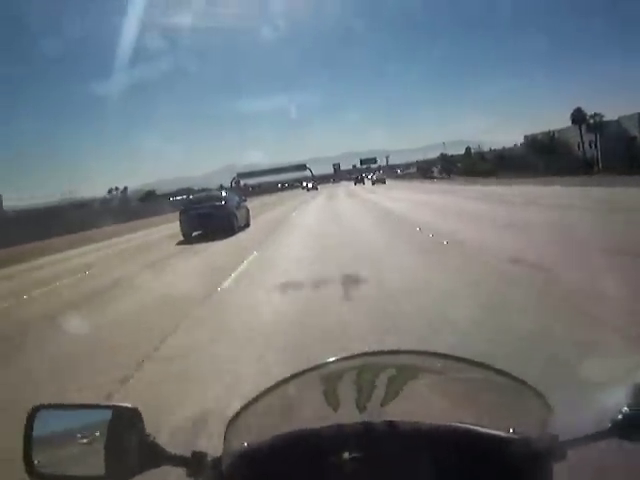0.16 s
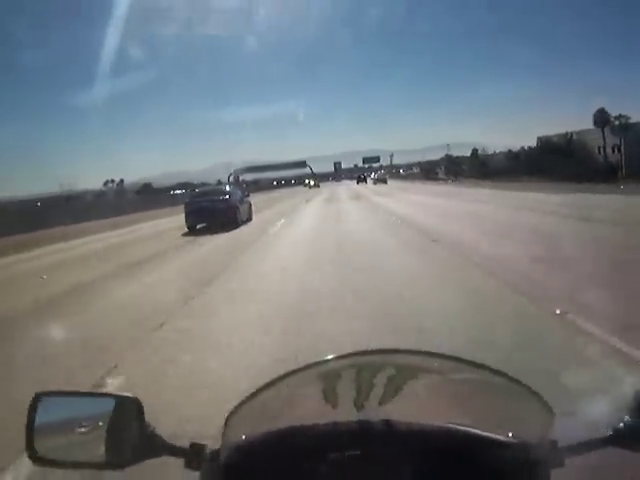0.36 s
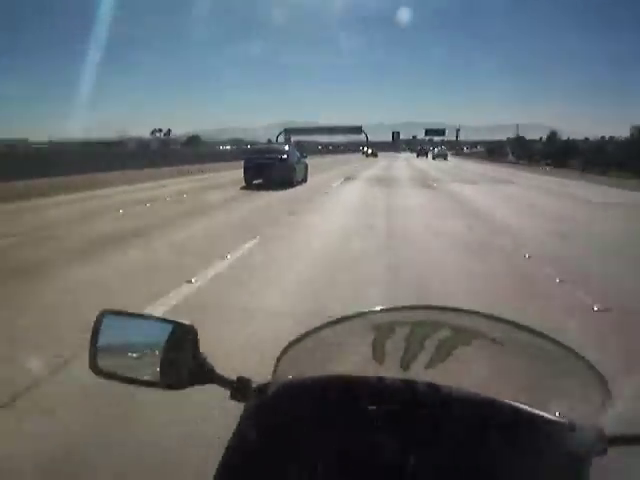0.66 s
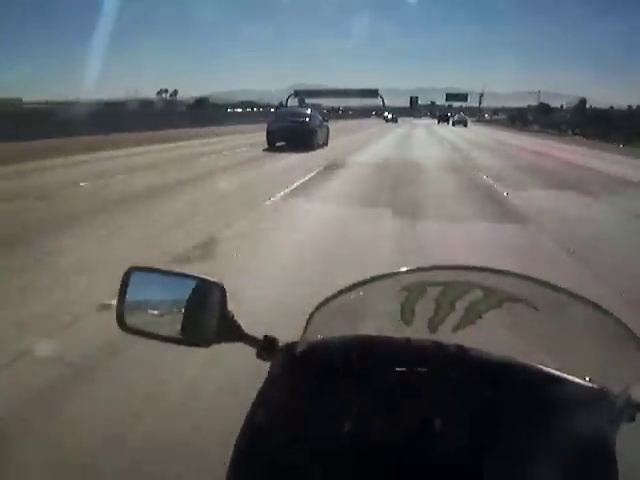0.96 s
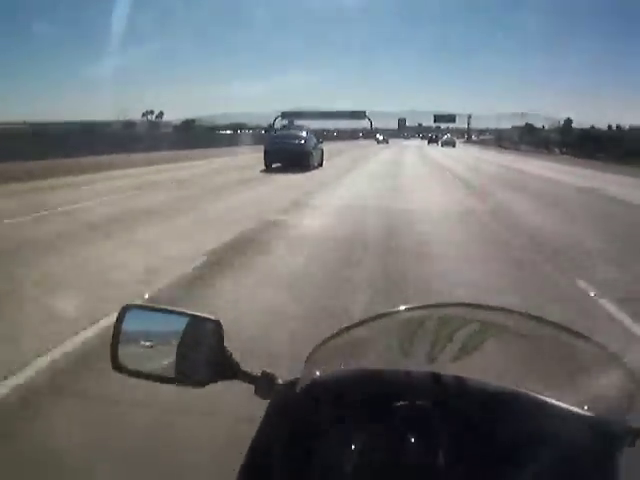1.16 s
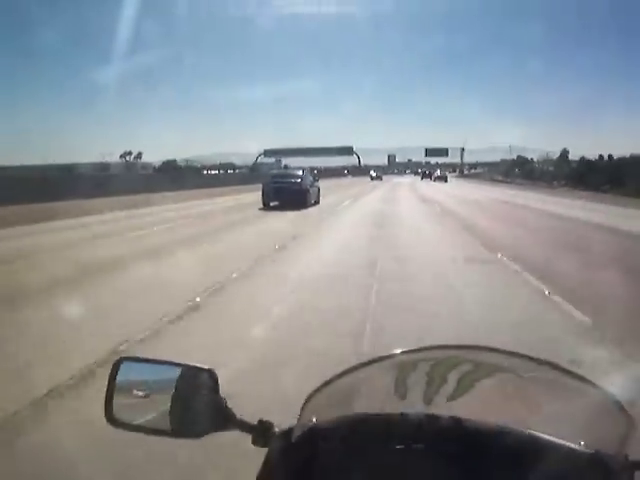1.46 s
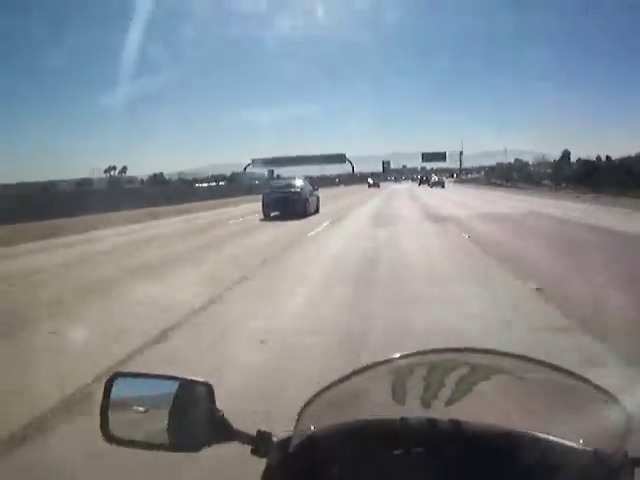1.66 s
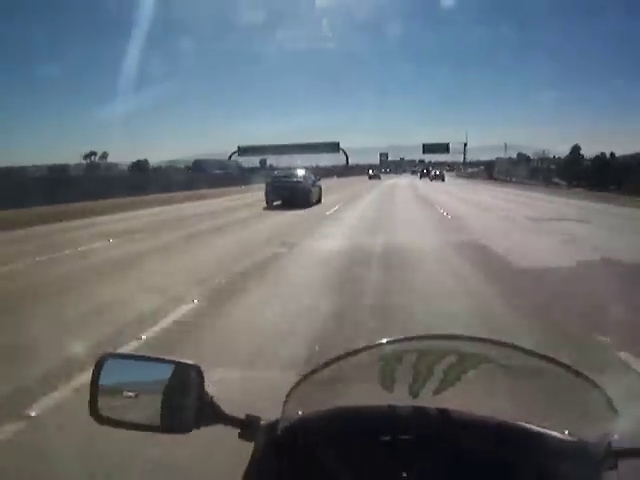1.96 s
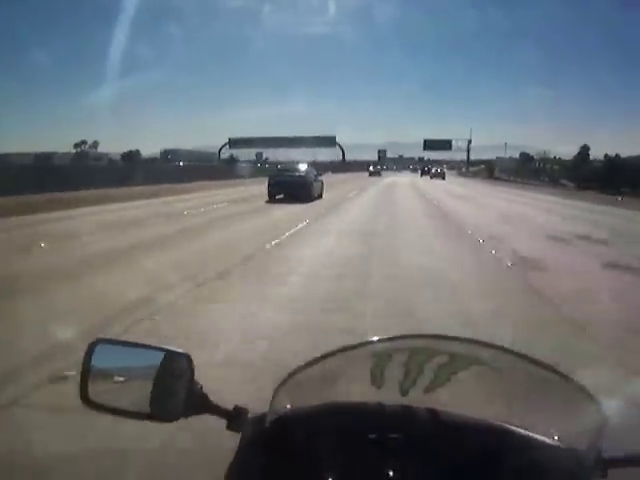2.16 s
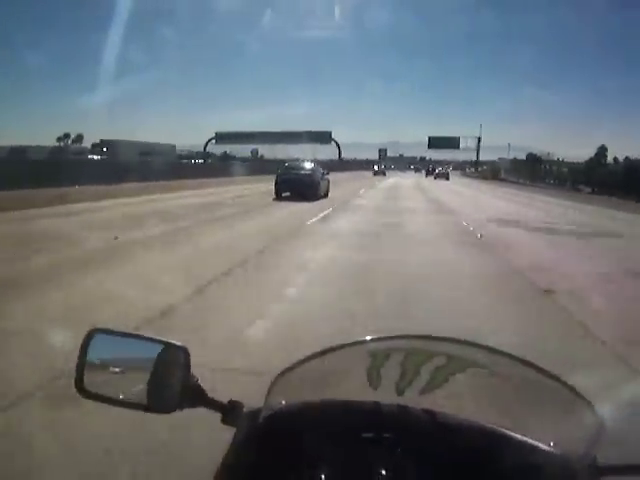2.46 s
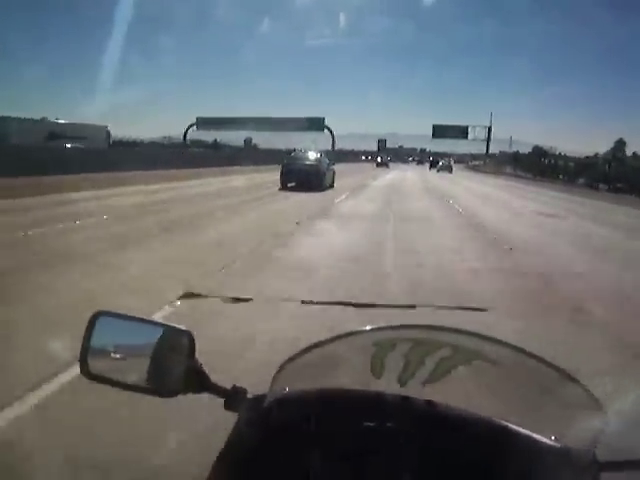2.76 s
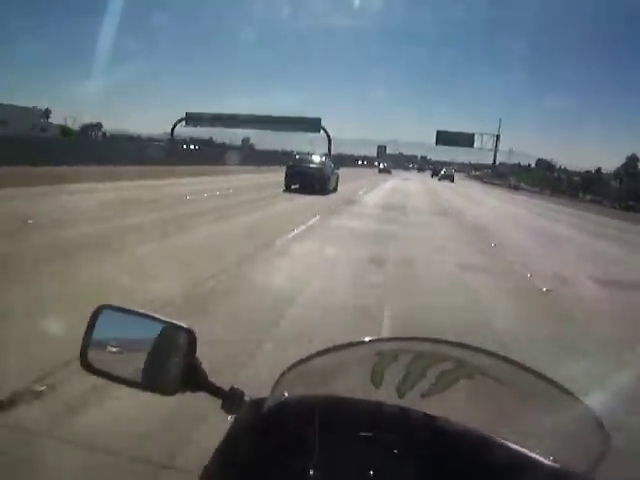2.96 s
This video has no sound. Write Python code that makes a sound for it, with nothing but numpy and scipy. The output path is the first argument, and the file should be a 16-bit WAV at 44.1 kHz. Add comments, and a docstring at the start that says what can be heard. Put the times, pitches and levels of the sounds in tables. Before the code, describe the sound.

Steady motorcycle drone at speed, buried in heavy low wind rumble and thumping microphone gusts

```python
"""Motorcycle cruising on a freeway

A motorcycle heard from a camera on the rider: orders of the firing rate hum and slowly climb in pitch.
Shaped noise makes the wind's rumble, buffeting and rush past the windscreen; short pushes thump and slap.
Tyres roar on the concrete as steady coloured noise, and an edge whistles faintly in narrow puffs.
Pressure swings rasp in the microphone, which rounds off the largest and answers pushes more than pulls."""
import sys
import numpy as np
from scipy.fft import rfft, irfft, next_fast_len
from scipy.io import wavfile
from scipy.ndimage import uniform_filter1d, map_coordinates

SR = 44100
rng = np.random.default_rng(int(sys.argv[2]) if len(sys.argv) > 2 else 0)


def digitize_waveform(pressure):
    """Quantize a signal to 16-bit integers and store it at the path in sys.argv[1].

    Rows of a 2-D input are taken as channels; values are limited to [-1, 1].
    """
    field = np.atleast_2d(pressure).T
    bounded = np.clip(field, -1, 1)
    quanta = np.round(bounded * 32767).astype(np.int16)
    wavfile.write(sys.argv[1], SR, quanta)


N = 136710  # samples, 3.1 s


def amp(db):
    """Decibels to gain."""
    return 10 ** (np.asarray(db) / 20)


def unit(x):
    """Scale to rms 1."""
    return x / np.sqrt(np.mean(x ** 2) + 1e-20)


def curves(rows):
    """One value per sample for each column after the time."""
    knots_s, *columns = np.transpose(rows)
    t = np.arange(N) / SR
    return [np.interp(t, knots_s, column) for column in columns]


def wobble(rate):
    """A smooth random curve through rate random knots a second."""
    knots = rng.standard_normal(int(N * rate / SR) + 4)
    return map_coordinates(knots, [np.arange(N) * rate / SR])


def filtered(x, response):
    """Multiply the spectrum of x by a response of frequency."""
    size = next_fast_len(N + SR // 2)  # zero padding keeps the end from wrapping to the start
    hz = np.fft.rfftfreq(size, 1 / SR)
    return irfft(rfft(x, size) * response(hz), size)[:N]


def noise(spectrum):
    """Noise of rms 1 coloured by (Hz, dB) points on a log axis."""
    points_hz, points_db = np.transpose(spectrum)

    def colour(hz):
        return amp(np.interp(np.log(hz + 1), np.log(points_hz + 1), points_db))

    return unit(filtered(rng.standard_normal(N), colour))


def evened(x, size):
    """Even out the slow chance swells of x over size samples, and scale to rms 1."""
    power = np.abs(uniform_filter1d(x ** 2, size))
    return unit(x / np.sqrt(power + 1e-9))


def bumps(events, half_s):
    """A bell-shaped swell for each (s, peak dB)."""
    t = np.arange(N) / SR
    return sum(amp(db) * np.exp(-np.minimum(((t - s) / half_s) ** 2, 20)) for s, db in events)


# firing rate of the engine: (time_s, rate_hz)
FIRING_RATE = [(0, 223.7), (.8, 227.7), (1.4, 229.9), (1.75, 231.6), (2.0, 232.6), (3.1, 237.3)]
# orders in the exhaust note: (multiple of the firing rate, level_db rms at mid-scene, drift_db_per_s)
EXHAUST_ORDERS = [(1, -30, 1.4), (2, -34, -1.1), (3, -57, -3), (4, -55, -1), (4.5, -74.5, 0), (5, -65, -3),
                  (5.5, -73, 5), (6, -57.5, 0), (6.5, -75.5, 1.5), (7, -69, -1.5), (7.5, -71, 2)]
# gain on the whole exhaust note, easing a little midway: (time_s, gain_db)
EXHAUST_GAIN = [(0, 0.5), (.45, 0.4), (1.35, 0.7), (1.8, -2), (2.15, 0), (2.45, 0.6), (3.1, 0.6)]
FLUTTER_DB, JITTER_RAD = 0.83, 0.037  # unevenness of the firings in strength and in timing


def engine():
    """Sines at orders of the firing rate share one timing unevenness; each flutters in level by itself."""
    rate_hz, = curves(FIRING_RATE)
    gain_db, = curves(EXHAUST_GAIN)
    phase = 2 * np.pi * np.cumsum(rate_hz) / SR + JITTER_RAD * wobble(45)
    from_middle_s = (np.arange(N) - N / 2) / SR
    note = np.zeros(N)
    for order, order_db, drift_db_per_s in EXHAUST_ORDERS:
        level_db = gain_db + order_db + drift_db_per_s * from_middle_s + FLUTTER_DB * wobble(16)
        start_phase = 2 * np.pi * rng.random()
        note += np.sqrt(2) * amp(level_db) * np.sin(order * phase + start_phase)
    return note


# levels of the deepest rumble, the buffeting and the rushing air, before their trims: (time_s, level_db)
RUMBLE_LEVEL = [(0, -22.5), (.13, -18.5), (.23, -28.5), (.35, -21), (.47, -22), (.65, -14.5), (.78, -25),
                (1.02, -14.5), (1.2, -24.5), (1.35, -18.5), (1.46, -22), (1.55, -21.5), (1.9, -22.5),
                (2.08, -17.5), (2.25, -18.5), (2.65, -27.5), (2.92, -17.5), (3.08, -21)]
BUFFET_LEVEL = [(0, -18.5), (.1, -22), (.29, -23.5), (.36, -17.5), (.43, -19), (.49, -22), (.535, -19),
                (.6, -24), (.67, -21), (.76, -22), (.82, -20), (1.06, -19.5), (1.16, -20.5), (1.33, -20),
                (1.4, -23), (1.6, -21.5), (1.72, -20.5), (1.88, -22.5), (1.97, -21), (2.08, -19.5),
                (2.2, -19.5), (2.37, -21), (2.45, -18), (2.65, -21), (2.74, -16.5), (2.82, -20.5),
                (2.91, -20), (2.97, -17), (3.08, -22.5)]
AIR_LEVEL = [(0, -38), (.14, -47.5), (.23, -33.5), (.36, -39), (.5, -38), (.75, -39), (.84, -40),
             (1.1, -41), (1.24, -34), (1.38, -35), (1.52, -42.5), (1.78, -30.5), (1.86, -39.5),
             (1.96, -37.5), (2.04, -41.5), (2.3, -35), (2.56, -37.5), (2.72, -31), (2.82, -40.5), (3, -36),
             (3.08, -33.5)]
# relative spectra of the three wind layers: (frequency_hz, density_db per Hz)
RUMBLE_SPECTRUM = [(5, -23.5), (15, -1), (32, 17), (50, 10.5), (80, -17.5), (200, -64)]
BUFFET_SPECTRUM = [(20, -26.5), (55, 1), (90, 0.5), (150, -1.5), (225, -7), (300, -11), (420, -17),
                   (550, -26.5), (750, -37), (1400, -85)]
AIR_SPECTRUM = [(150, -6), (320, 8), (450, 1.5), (560, -1.5), (680, -7), (820, -12), (1000, -16),
                (1500, -20), (2500, -21), (5000, -53)]
RUMBLE_TRIM_DB, BUFFET_TRIM_DB, AIR_TRIM_DB = -2.5, -0.18, 1.5


def wind():
    """Slow eddies rumble, faster ones buffet the microphone, and air rushes past in quick flurries."""
    rumble_db, = curves(RUMBLE_LEVEL)
    buffet_db, = curves(BUFFET_LEVEL)
    air_db, = curves(AIR_LEVEL)
    rumble = amp(rumble_db + RUMBLE_TRIM_DB) * evened(noise(RUMBLE_SPECTRUM), size=4000)
    buffet = amp(buffet_db + BUFFET_TRIM_DB) * evened(noise(BUFFET_SPECTRUM), size=2500)
    flurries = amp(6.2 * np.tanh(wobble(100)))  # swings of up to 6.2 dB either way
    air = amp(air_db + AIR_TRIM_DB) * evened(noise(AIR_SPECTRUM) * flurries, size=4000)
    return rumble + buffet + air


# large eddies that thump the microphone: (time_s, peak_db of pressure before overload, half_length_s)
THUMPS = [(0.468, -12, 0.0039), (0.658, -18.5, 0.011), (1.018, -17, .009), (1.441, -19, 0.0088),
          (2.046, -12, 0.0047), (2.111, -14, 0.013), (2.867, -11, .006), (2.923, -8, 0.011)]


def thumps():
    """A large eddy gives one slow push with suction before and after it."""
    pressure = np.zeros(N)
    for s, peak_db, half_s in THUMPS:
        push = 2 * bumps([(s, peak_db)], half_s)
        suction = bumps([(s, peak_db)], 2 * half_s)
        pressure += push - suction
    return pressure


# hardest slaps of wind on the microphone: (time_s, peak_db of pressure before overload, hiss_db)
SLAPS = [(0.355, -12.5, -39.5), (.460, -11, -41), (.533, -4.5, -44), (.651, -5, -44), (0.716, -6, -41.5),
         (.817, -7.5, -44), (.841, -6.5, -46), (.964, -9.5, -40.5), (1.026, -11, -41.5), (1.082, -7.5, -49),
         (1.283, -13, -40), (1.374, -12.5, -46), (1.465, -7.5, -49), (1.593, -7.5, -45.5),
         (1.716, -9.5, -46), (1.798, -8.5, -43), (1.966, -8.5, -46), (2.070, -20, -37.5),
         (2.113, -2.5, -46), (2.201, -8, -41), (2.384, -9, -43), (2.918, -8.5, -38.5), (2.971, -12, -45)]
SLAP_S, SLAP_CLEARS_S = 0.0013, 0.003  # half lengths of the push and of the gap it makes in the other wind


def slaps(flow):
    """Single strong eddies displace the flow with one short push each."""
    taken = np.minimum(bumps([(s, 0) for s, _, _ in SLAPS], SLAP_CLEARS_S), 1)
    pushes = bumps([(s, peak_db) for s, peak_db, _ in SLAPS], SLAP_S)
    return flow * (1 - taken) + pushes


# relative spectrum of the hiss in a slap: (frequency_hz, density_db per Hz)
SPIT_SPECTRUM = [(300, 4), (700, 7), (1200, 2), (2200, 0), (3500, -2), (5000, -7.5), (7500, -9.5),
                 (8500, -24.5)]
SPIT_S = 0.0027  # half length of the hiss


def spit():
    """Each slap spits a short burst of coloured hiss."""
    bursts = bumps([(s, hiss_db) for s, _, hiss_db in SLAPS], SPIT_S)
    return bursts * noise(SPIT_SPECTRUM)


OVERLOAD = 0.43  # pressure at which the microphone gives out


def overloaded(pressure):
    """The microphone rounds off the largest swings."""
    return pressure / (1 + (pressure / OVERLOAD) ** 4) ** (1 / 4)


# relative spectrum of the rasp: (frequency_hz, density_db per Hz)
RASP_SPECTRUM = [(500, -5.5), (2000, 1), (3500, 5.5), (4200, -4.5), (5500, -2), (6800, -3.5), (7600, 0.5),
                 (8500, -17)]
RASP_DB = -56  # rms level
RASP_GROWS, RASP_PUSH = 0.7, 0.22  # power law of the rasp; how much more a push counts than a pull


def rasp(pressure):
    """Pressure swings drive hiss through the microphone port, more of it the larger they are."""
    swing = np.abs(unit(pressure)) * (1 + RASP_PUSH * (pressure > 0))
    return amp(RASP_DB) * unit(swing ** RASP_GROWS * noise(RASP_SPECTRUM))


# level of the tyre noise before its trim: (time_s, level_db)
ROAD_LEVEL = [(0, -46), (.22, -45.5), (.55, -46.5), (1.1, -45), (1.35, -45.5), (1.5, -47), (1.88, -46.5),
              (2.08, -45), (2.7, -45), (3.08, -45.5)]
# relative spectrum of the tyre noise: (frequency_hz, density_db per Hz)
ROAD_SPECTRUM = [(400, -4), (1000, -8.5), (1400, -3.5), (1800, -4), (2120, 1), (2500, -6.5), (2900, -12),
                 (3300, -10), (3580, -7), (4050, -15.5), (4600, -12.5), (5400, -17.5), (6800, -16.5),
                 (8500, -40)]
ROAD_TRIM_DB, ROAD_FLUTTER_DB = 2, 0.5


def road():
    """Tyre and machine noise, coloured by the camera housing, flutters slightly in level."""
    level_db, = curves(ROAD_LEVEL)
    return amp(ROAD_TRIM_DB + level_db + ROAD_FLUTTER_DB * wobble(90)) * noise(ROAD_SPECTRUM)


# puffs of the edge whistle: (middle_s, length_s, pitch_hz before wander, level_db)
WHISTLE_PUFFS = [(0.294, 0.061, 4527, -64), (0.524, .06, 4610, -55), (0.675, 0.07, 4840, -55),
                 (0.798, 0.058, 4620, -53.5), (0.903, .05, 4900, -59), (1.03, 0.075, 5000, -56),
                 (1.201, .08, 4590, -55), (1.3, 0.042, 4953, -56), (1.36, .05, 4600, -63),
                 (2.113, 0.03, 4730, -50), (2.177, 0.046, 4580, -53.5), (2.31, 0.051, 4735, -51.5),
                 (2.381, .04, 4680, -50.5), (2.525, 0.16, 4650, -58.5), (2.673, 0.11, 4720, -50),
                 (2.751, 0.059, 4890, -53), (2.847, 0.078, 4750, -54), (2.944, 0.044, 4700, -56),
                 (3.06, 0.13, 4710, -52)]
WHISTLE_WIDTH_HZ, WHISTLE_SKIRT_DB, WHISTLE_WANDER_HZ = 85, -4, 45


def whistle():
    """Puffs of narrow air noise from an edge, each at its own unsteady pitch."""
    t = np.arange(N) / SR
    pitch_hz, = curves([(s, hz) for s, _, hz, _ in WHISTLE_PUFFS])
    wandering_hz = pitch_hz + WHISTLE_WANDER_HZ * wobble(50)
    carrier = np.exp(2j * np.pi * np.cumsum(wandering_hz) / SR)

    def band(width_hz):
        """Slow complex noise, shifted up to the whistle's pitch."""
        slow = wobble(2 * width_hz) + 1j * wobble(2 * width_hz)
        return unit(np.real(carrier * slow))

    power = sum(amp(db) ** 2 * np.exp(-(2 * (t - s) / length_s) ** 2)
                for s, length_s, _, db in WHISTLE_PUFFS)
    core = band(WHISTLE_WIDTH_HZ)
    skirt = amp(WHISTLE_SKIRT_DB) * band(3 * WHISTLE_WIDTH_HZ)
    flutter = amp(1.2 * wobble(99))
    return np.sqrt(power) * unit(flutter * (core + skirt))


def scene():
    """Wind and engine overload the one microphone together; rasp, hiss, road and whistle add to them."""
    flow = slaps(wind() + thumps())
    pressure = overloaded(flow + engine())
    return (pressure + rasp(pressure) + spit() + road() + whistle())[None]


LOPSIDED = 0.51  # extra microphone gain per unit of pressure
BOTTOM_HZ, TOP_HZ = 8, 8600  # corners of the gentle low cut and the steep high cut


def record(dry):
    """The microphone answers pushes more than pulls; the camera drops steady pressure and high treble."""
    bent = dry[0] + LOPSIDED * (dry[0] ** 2 - np.mean(dry[0] ** 2))

    def camera(hz):
        low_cut = hz ** 2 / (hz ** 2 + BOTTOM_HZ ** 2)
        return low_cut / np.sqrt(1 + (hz / TOP_HZ) ** 100)

    return filtered(bent, camera)[None]


dry = scene()
out = record(dry)
digitize_waveform(out)
```